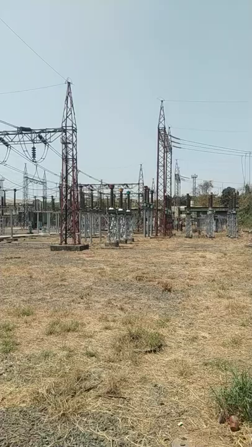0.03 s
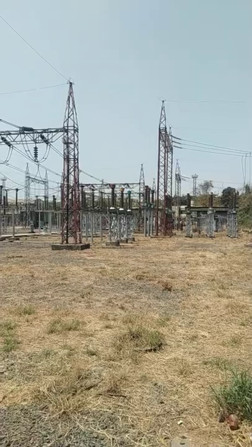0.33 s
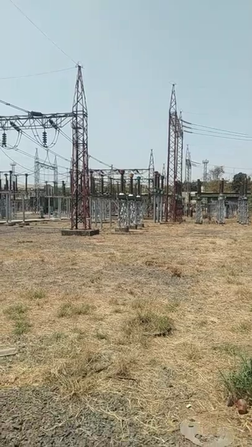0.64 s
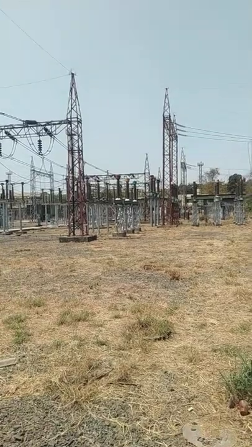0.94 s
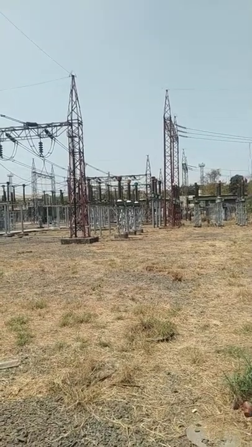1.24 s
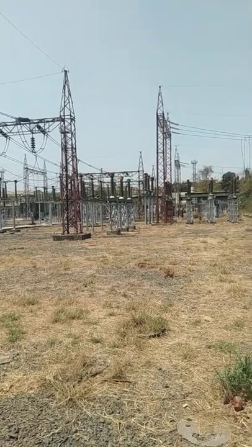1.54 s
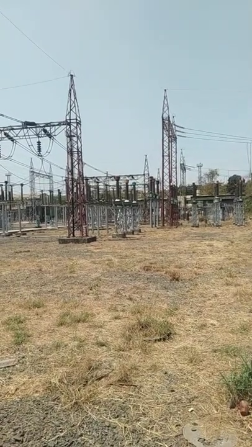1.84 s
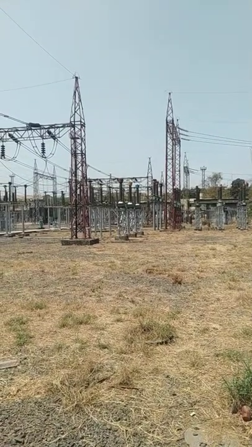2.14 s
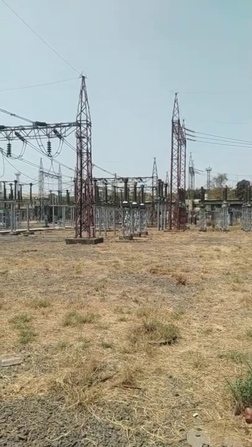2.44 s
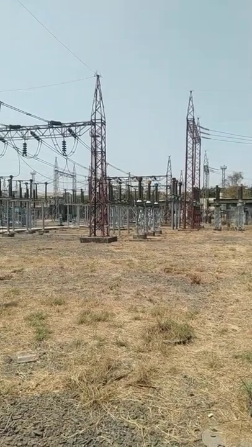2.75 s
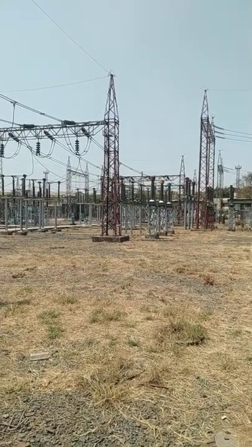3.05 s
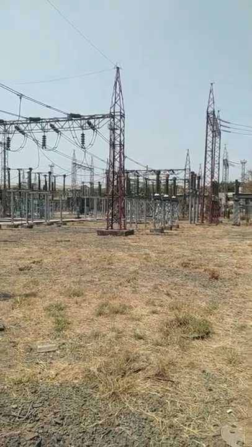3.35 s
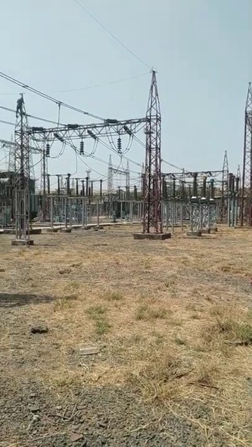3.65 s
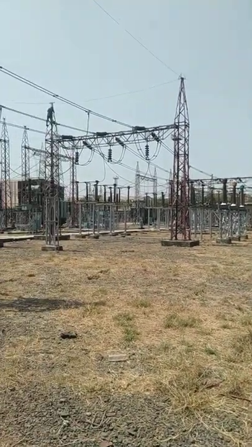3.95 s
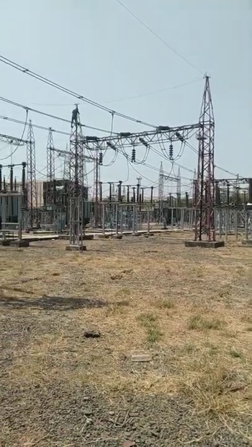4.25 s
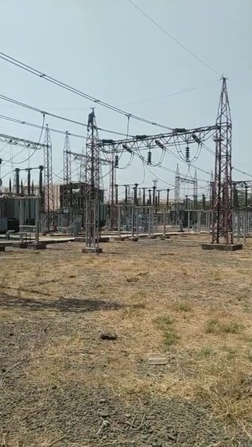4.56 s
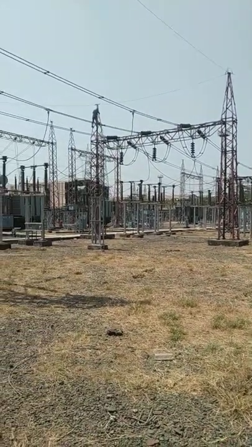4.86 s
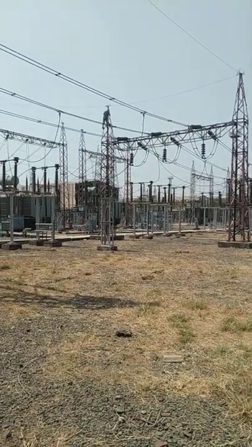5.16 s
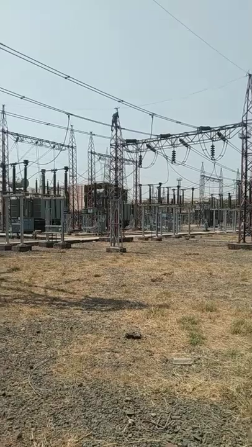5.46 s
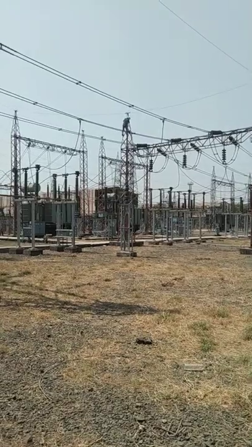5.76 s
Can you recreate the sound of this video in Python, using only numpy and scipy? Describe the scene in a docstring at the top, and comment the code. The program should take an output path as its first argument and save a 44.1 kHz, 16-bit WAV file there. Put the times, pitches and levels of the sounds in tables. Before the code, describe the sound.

In a dry outdoor substation, wind hits the microphone with a rumble and irregular thumps, masking the yard behind it. Halfway through, the wind ends and transformer cooling fans carry on with an even rush of air, a whine and a slight electrical hum. Very faint bird calls and whistles come from the distance, and something ticks twice near the microphone.

```python
"""Substation yard in gusts.

Wind buffets the microphone for three seconds; the recorder's gain control holds the dry, open yard
down beneath it. Then the rush and whine of transformer cooling fans stands clear, over the weak
mains hum of the flexing core. Far off: a bird's calls, thin whistles, a long faint chirr near the end.
Something ticks twice close by."""
import sys
import numpy as np
from scipy import signal
from scipy.fft import rfft, irfft
from scipy.io import wavfile
from scipy.ndimage import uniform_filter1d

SR = 44100
rng = np.random.default_rng(int(sys.argv[2]) if len(sys.argv) > 2 else 0)


def generate_wav(signal):
    """Clip the signal to [-1, 1] and save it as 16-bit WAV at the path in sys.argv[1]."""
    frames = np.transpose(np.atleast_2d(signal))
    scaled = np.clip(frames, -1, 1) * 32767
    pcm = np.round(scaled).astype(np.int16)
    wavfile.write(sys.argv[1], SR, pcm)


N = 265482

# All levels are ahead of the gain control.
# wind on the microphone port (time [s], level [dB])
WIND_LEVEL = [(0.37, -15.5), (0.47, -21.5), (0.62, -17.5), (0.8, -24), (0.93, -25), (1.0, -21.5),
              (1.22, -19), (1.34, -12), (1.41, -20.5), (1.55, -14.5), (1.76, -14), (2.0, -20), (2.33, -27),
              (2.5, -21.5), (2.6, -29), (2.73, -25), (2.85, -32.5), (2.98, -34.5)]
# dropouts between gusts (centre [s], length [s], depth [dB])
WIND_LULLS = [(0.712, 0.12, 12), (1.057, 0.085, 18), (2.381, 0.06, 20.5), (2.767, 0.038, 13),
              (2.915, 0.081, 12)]
# single hard eddies (time [s], peak [dB])
HARD_EDDIES = [(0.375, -11), (0.517, -18), (0.581, -11), (0.595, -13), (0.990, -11.5), (1.226, -9),
               (1.248, -8), (1.331, -3), (1.35, -7.5), (1.434, -16), (1.471, -14.5), (1.705, -7),
               (1.732, -5), (1.858, -9.5), (1.903, -10), (1.986, -18), (2.016, -17), (2.209, -21),
               (2.405, -17), (2.451, -21), (2.525, -11.5), (2.633, -16.5), (2.698, -18.5)]
# port pressure to signal (frequency [Hz], relative gain [dB])
PORT_RESPONSE = [(15, -18.5), (40, -23.5), (60, -10), (85, 1.5), (115, 3.5), (165, 1), (210, -5.5),
                 (280, 4), (370, 0.5), (520, -5.5), (800, -8), (1300, -12), (3000, -15.5), (9000, -28.5)]
# air through the radiators (frequency [Hz], relative density [dB])
RUSH_SPECTRUM = [(25, -27), (50, -17.5), (90, -4.5), (220, -9), (290, 0), (420, -0.5), (540, -7),
                 (720, -2.5), (1200, -8.5), (1700, -10), (2500, -17), (3800, -26), (4800, -29), (7200, -43)]
# fan housing resonances (frequency [Hz], width [Hz], level [dB re YARD_DB])
HOUSING_MODES = [(348, 35, -12.3), (686.5, 14, -13.5), (830, 34, -13.5), (1352, 45, -25), (2074, 84, -22.5),
                 (2760, 83, -29)]
# fan blade tones (frequency [Hz], level [dB re YARD_DB])
BLADE_TONES = [(296.1, -14), (623, -19), (802, -20), (990, -22), (1365.5, -20.5)]
# strongest fan tone (time [s], level [dB re YARD_DB])
WHINE_LEVEL = [(0.36, -16), (2.1, -10), (3.3, -12), (3.8, -14.5), (4.12, -5.5), (4.55, -11.5), (4.85, -8.5),
               (5.5, -5.5), (6.02, -7.5)]
# core hum (multiple of mains, level [dB re YARD_DB])
HUM_HARMONICS = [(2, -22.5), (4, -23), (8, -26), (10, -21.5), (16, -20.5)]
# thin, level whistles far off; last, a long faint chirr (time [s], length [s], pitch [Hz], level [dB])
FAR_WHISTLES = [(0.413, 0.046, 2920, -66), (0.686, 0.1, 3230, -73), (1.92, 0.36, 3125, -69),
                (3.28, 0.25, 3090, -69.5), (4.54, 0.031, 2810, -65), (4.75, 1.25, 2790, -71)]
# a far bird's calls (time [s], level [dB])
BIRD_CALLS = [(0.496, -53.5), (3.733, -59.5)]
# notes of one call (delay [s], length [s], start [Hz], end [Hz], level [dB re call])
BIRD_NOTES = [(0, 0.049, 2646, 2315, 0), (0.066, 0.105, 2200, 2107, -3)]
# close ticks (time [s], peak [dB])
TICK_EVENTS = [(2.046, -41), (5.6435, -41)]
# one tick (frequency [Hz], relative level [dB])
TICK_SPECTRUM = [(500, -29.5), (2000, -11), (3600, 6), (7500, -14), (9500, -27), (15000, -41)]

WIND_END_S, WIND_FALL_S = 3.0, 0.018
YARD_DB, WHINE_HZ, MAINS_HZ = -45.5, 835.4, 50


def from_db(db):
    """Decibels to gain."""
    return 10 ** (np.asarray(db) / 20)


def unit_rms(x):
    """Scale to unit power."""
    return x / np.sqrt(np.mean(x ** 2) + 1e-20)


def seconds():
    """Time of every sample."""
    return np.arange(N) / SR


def curve(rows):
    """Interpolate (time, value) rows at every sample."""
    return np.interp(seconds(), *np.transpose(rows))


def drift(rate_hz, hop=40, warmup=2000):
    """Smooth random wander, unit RMS."""
    pole = np.exp(-2 * hop * np.pi * rate_hz / SR)
    noise = rng.standard_normal(N // hop + warmup + 2)
    slow = signal.lfilter([1], [1, -2 * pole, pole * pole], noise)[warmup:]
    return np.interp(np.arange(N) / hop, np.arange(len(slow)), unit_rms(slow))


def low_pass(x, hz, order):
    """Butterworth low-pass."""
    return signal.sosfilt(signal.butter(order, hz, fs=SR, output="sos"), x)


def colour(x, spectrum, size=8192):
    """Minimum-phase filter from (Hz, dB) rows."""
    hz, db = np.transpose(spectrum)
    grid_hz = np.maximum(np.arange(size // 2 + 1) * SR / size, 1)
    gain = from_db(np.interp(np.log(grid_hz), np.log(hz), db))
    cepstrum = irfft(np.log(gain))
    cepstrum[1:size // 2] *= 2
    cepstrum[size // 2 + 1:] = 0
    impulse = irfft(np.exp(rfft(cepstrum)))
    return signal.fftconvolve(x, impulse)[:len(x)]


def add(out, time_s, sound):
    """Mix in place at a given time."""
    at = int(time_s * SR)
    out[at:at + len(sound)] += sound[:N - at]


def tone(hz, waver_hz, flutter_db):
    """Unit-power sine; pitch and level waver in the moving air."""
    cycles = np.cumsum(hz + waver_hz * drift(5.96)) / SR + rng.random()
    return unit_rms(np.sin(2 * np.pi * cycles) * from_db(flutter_db * drift(8.9)))


def wind_strength_db():
    """Slow swell and fall, broken by short rounded lulls."""
    db = curve(WIND_LEVEL)
    for centre_s, length_s, depth_db in WIND_LULLS:
        add(db, centre_s - length_s / 2, -depth_db * np.hanning(int(length_s * SR)))
    return db


def eddy_strength_db(spread_db=2.4, clump_db=2.0, stall_db=11, stall_s=0.011, wake_db=5, wake_s=0.0088):
    """Eddies come in clumps; the flow stalls before each hard one and surges in its wake."""
    db = spread_db * np.clip(rng.standard_normal(N), -2, 2)
    db += clump_db * np.clip(drift(55), -2.5, 1.3)
    for time_s, _ in HARD_EDDIES:
        add(db, time_s - stall_s, -stall_db * np.sqrt(np.hanning(int(stall_s * SR))))
        add(db, time_s, wake_db * np.linspace(1, 0, int(wake_s * SR)))
    return db


def turbulence(eddies_per_s=1200, corner_hz=500, ref_wind_db=-20, wind_share=0.45, db_per_octave=17):
    """Eddies hit the port; stronger eddies and stronger wind pass faster and sound brighter."""
    wind_db, eddy_db = wind_strength_db(), eddy_strength_db()
    arrivals = rng.random(N) < eddies_per_s / SR
    eddies = arrivals * rng.choice([-1, 1], N) * from_db(eddy_db)
    brightness_oct = np.clip((eddy_db + wind_share * (wind_db - ref_wind_db)) / db_per_octave, -1, 1)
    octaves, step_oct = np.linspace(-1, 1, 10, retstep=True)
    pressure = np.zeros(N)
    for octave in octaves:  # each eddy splits between the two nearest low-passes
        weight = np.maximum(1 - abs(brightness_oct - octave) / step_oct, 0)
        pressure += low_pass(eddies * weight + 1e-18, corner_hz * 2 ** octave, order=4)
    rumble = colour(pressure, PORT_RESPONSE)
    # levelled over 50 ms, so the wind alone sets the slow envelope
    power = uniform_filter1d(rumble ** 2, int(0.05 * SR))
    rumble /= np.sqrt(np.abs(power) + 1e-12)
    envelope = from_db(wind_db) * np.clip((WIND_END_S - seconds()) / WIND_FALL_S, 0, 1)
    return low_pass(rumble * envelope, hz=2400, order=4)


def buffets(ref_hz=784, ref_db=-10, db_per_octave=34):
    """Hard eddies push or pull on the port as single thumps; harder is brighter."""
    out = np.zeros(N)
    signs = rng.choice([-1, 1], len(HARD_EDDIES))
    for (time_s, peak_db), sign in zip(HARD_EDDIES, signs):
        corner_hz = ref_hz * 2 ** ((peak_db - ref_db) / db_per_octave)
        pressure = low_pass(signal.unit_impulse(4096), corner_hz, order=4)
        thump = colour(pressure, PORT_RESPONSE)
        add(out, time_s, sign * from_db(peak_db) * thump / abs(thump).max())
    return out


def fans():
    """Air rushes through the radiators, the housing rings in it, the blades add tones."""
    rush = unit_rms(colour(rng.standard_normal(N), RUSH_SPECTRUM))
    out = rush * from_db(-1.12 + 0.16 * drift(6.5))
    for hz, width_hz, db in HOUSING_MODES:
        resonator = signal.iirpeak(hz, hz / width_hz, fs=SR)
        out += from_db(db) * unit_rms(signal.lfilter(*resonator, rng.standard_normal(N)))
    for hz, db in BLADE_TONES:
        out += from_db(db) * tone(hz, waver_hz=0.63, flutter_db=2.5)
    whine = from_db(curve(WHINE_LEVEL)) * tone(WHINE_HZ, waver_hz=2.58, flutter_db=2.4)
    return out + whine


def core_hum():
    """The transformer core flexes twice per mains cycle: even harmonics."""
    return sum(from_db(db) * tone(k * MAINS_HZ, waver_hz=0.088, flutter_db=1) for k, db in HUM_HARMONICS)


def whistles_and_calls(blur_hz=70):
    """Whistles and chirr hold pitch, bird notes slide down and settle; distance blurs all."""
    notes = [(time_s + delay_s, length_s, start_hz, end_hz, call_db + note_db)
             for time_s, call_db in BIRD_CALLS
             for delay_s, length_s, start_hz, end_hz, note_db in BIRD_NOTES]
    notes += [(time_s, length_s, hz, hz, db) for time_s, length_s, hz, db in FAR_WHISTLES]
    out = np.zeros(N)
    jitter_hz = blur_hz * drift(160)
    for time_s, length_s, start_hz, end_hz, db in notes:
        progress = np.linspace(0, 1, int(length_s * SR))
        hz = end_hz + (start_hz - end_hz) * (1 - progress) ** 3
        hz += jitter_hz[int(time_s * SR):][:len(hz)]
        envelope = from_db(db) * 2 * np.sin(np.pi * progress)
        add(out, time_s, envelope * np.sin(2 * np.pi * np.cumsum(hz) / SR))
    return out


def ticks():
    """Dry, bright clicks close to the microphone."""
    out = np.zeros(N)
    click = colour(signal.unit_impulse(512), TICK_SPECTRUM)
    for time_s, peak_db in TICK_EVENTS:
        add(out, time_s, from_db(peak_db) * click / abs(click).max())
    return out


def gain_control(x, threshold_db=-42, cut_db_per_db=0.48, recovery_db_per_s=84.5, detector_s=0.025):
    """Loud sound cuts the gain at once; it recovers at a steady rate."""
    power = uniform_filter1d(x ** 2, int(detector_s * SR))
    level_db = 10 * np.log10(np.abs(power) + 1e-12)
    demand_db = cut_db_per_db * np.maximum(level_db - threshold_db, 0)
    ramp_db = recovery_db_per_s * seconds()
    cut_db = np.maximum.accumulate(demand_db + ramp_db) - ramp_db
    return x * from_db(-uniform_filter1d(cut_db, size=400))


def scene(band_edge_hz=7510):
    """Mono: wind in front, yard behind; only the ticks bypass the low-pass."""
    wind = turbulence() + buffets()
    yard = from_db(YARD_DB) * (fans() + core_hum())
    return (low_pass(wind + yard + whistles_and_calls(), band_edge_hz, order=14) + ticks())[None]


def record(dry, open_s=0.3632, fade_s=0.0093, hiss_db=-92.5, cutoff_hz=15500):
    """The input opens after a brief silence; gain control, faint hiss, steep top cut."""
    gate = np.clip((seconds() - open_s) / fade_s, 0, 1)
    hiss = from_db(hiss_db) * rng.standard_normal(N)
    top_cut = signal.ellip(10, 0.1, 80, cutoff_hz, fs=SR, output="sos")
    return signal.sosfilt(top_cut, gate * (gain_control(dry) + hiss))


dry = scene()
out = record(dry)
generate_wav(out)
```